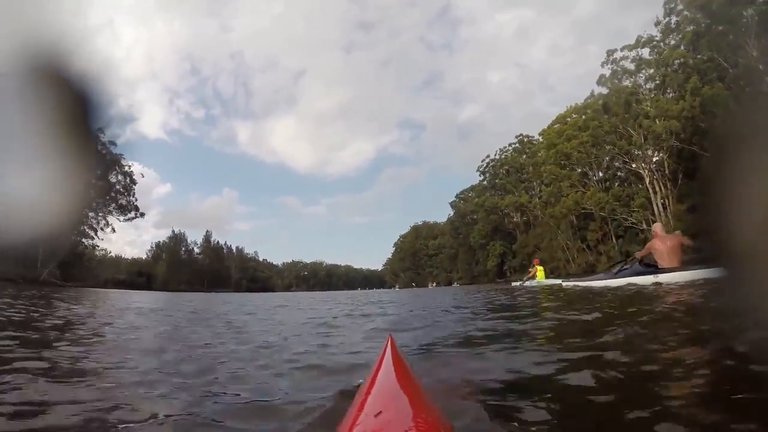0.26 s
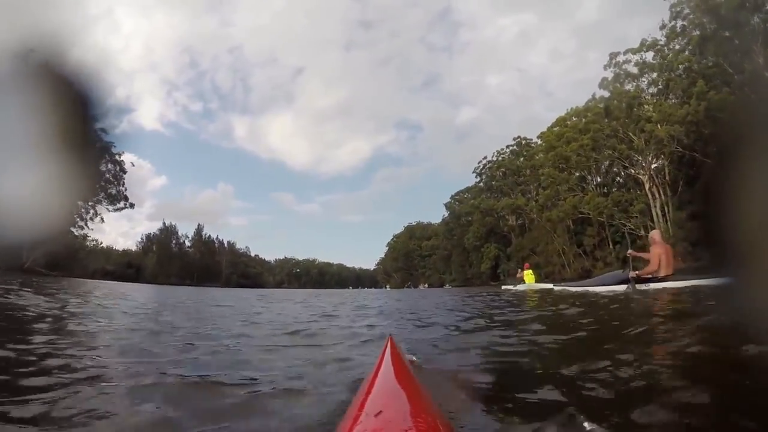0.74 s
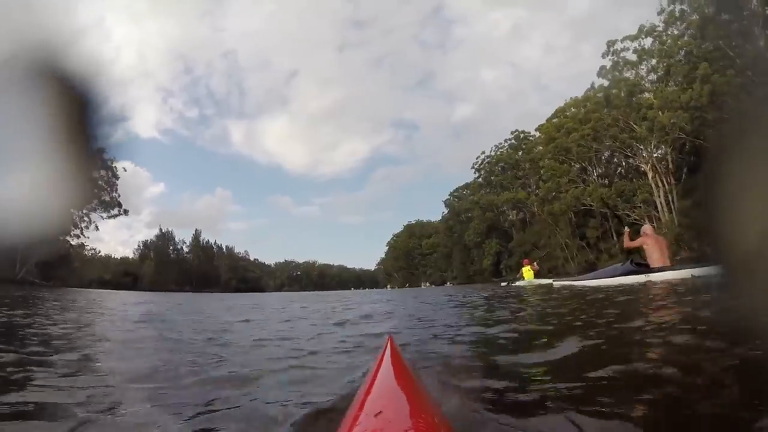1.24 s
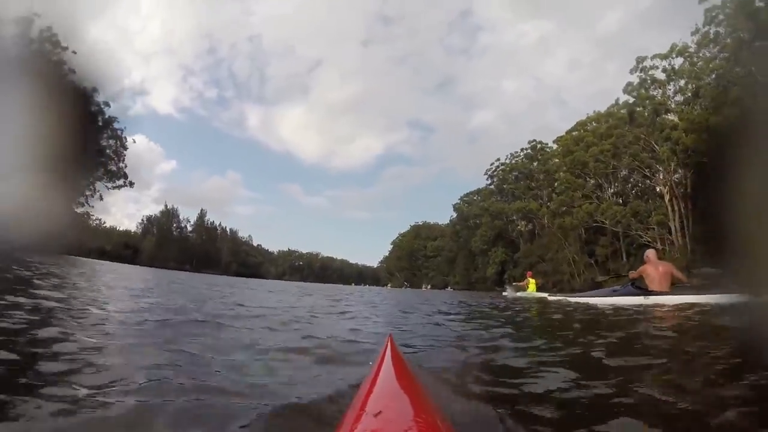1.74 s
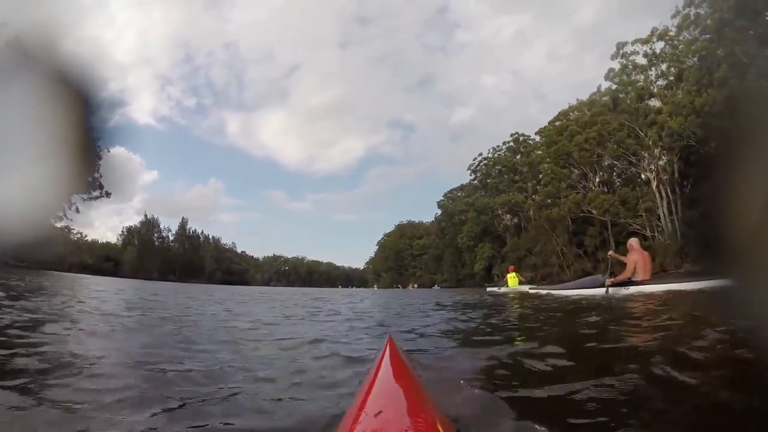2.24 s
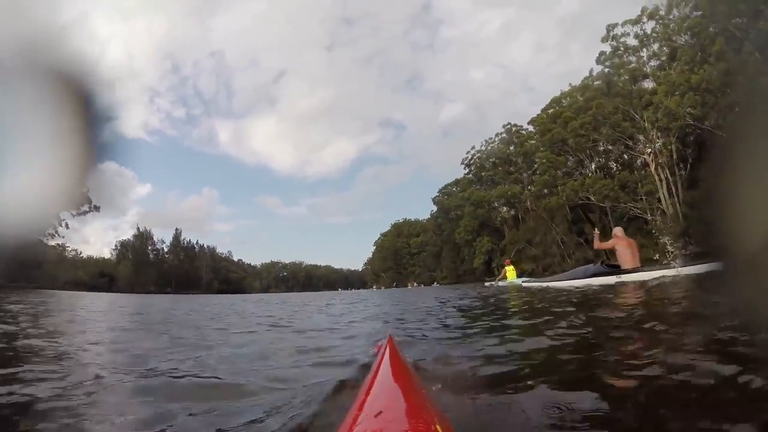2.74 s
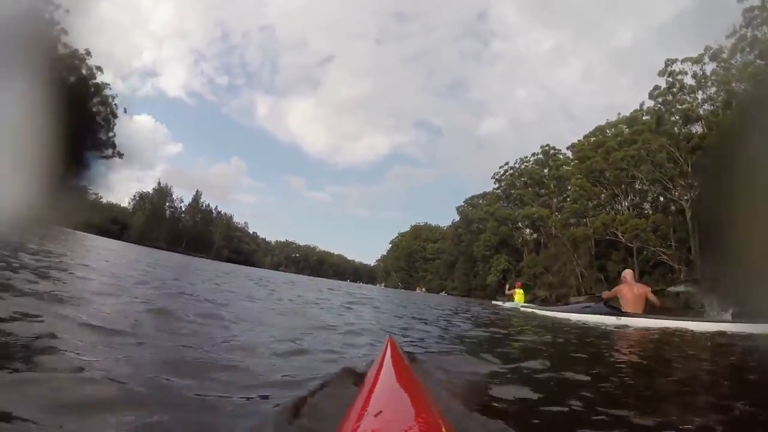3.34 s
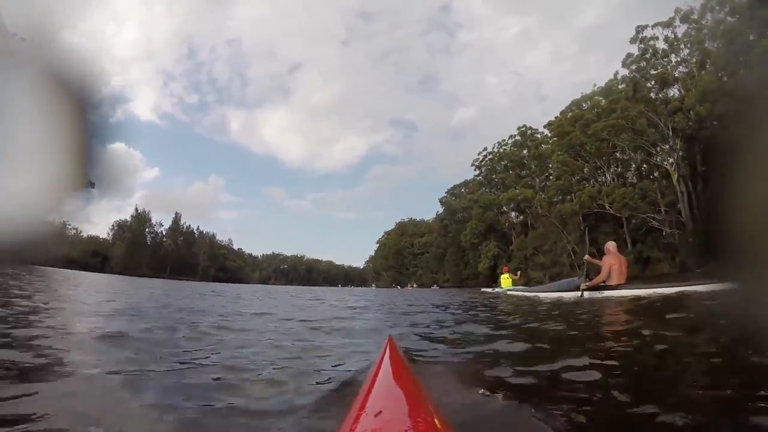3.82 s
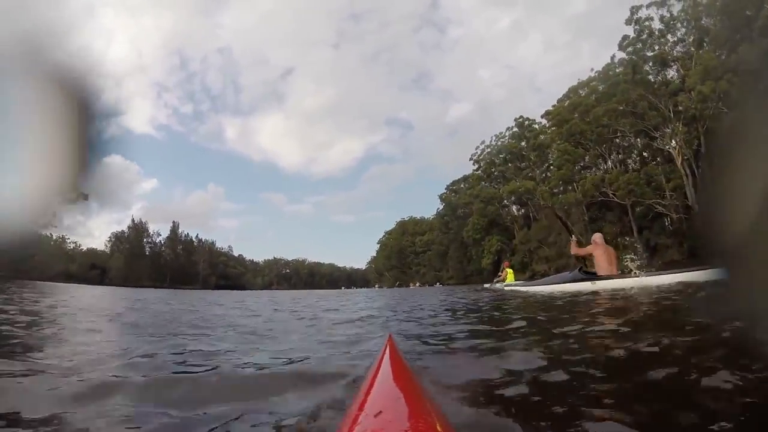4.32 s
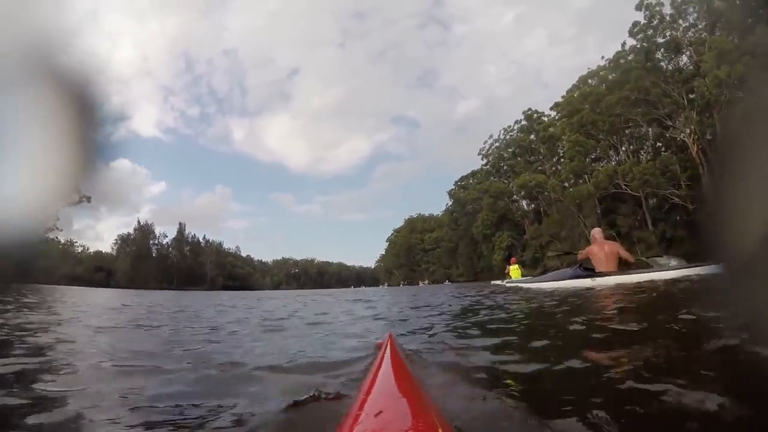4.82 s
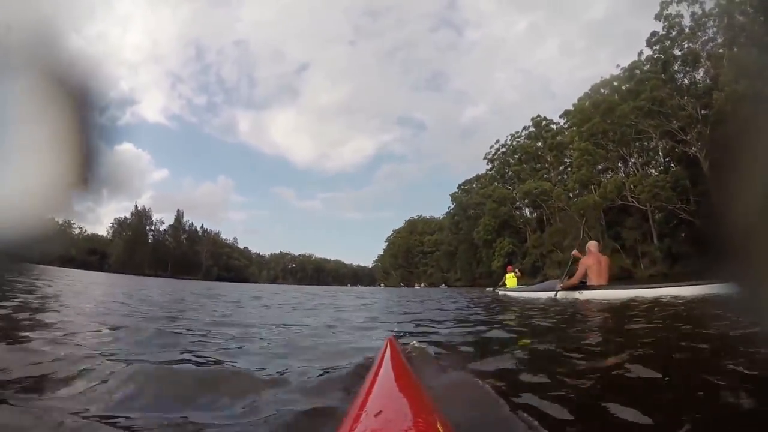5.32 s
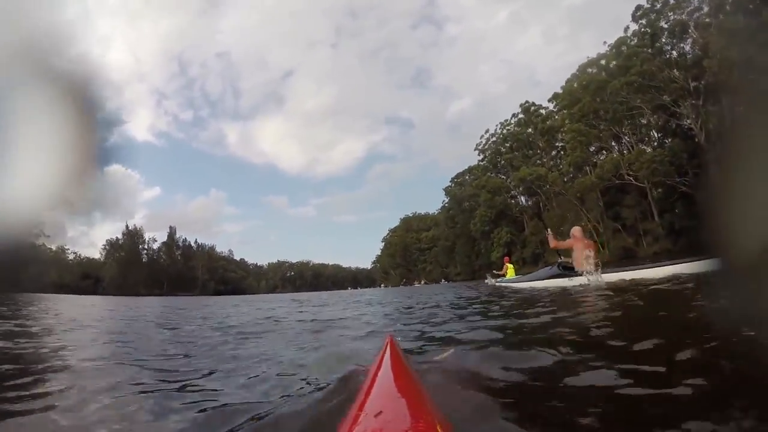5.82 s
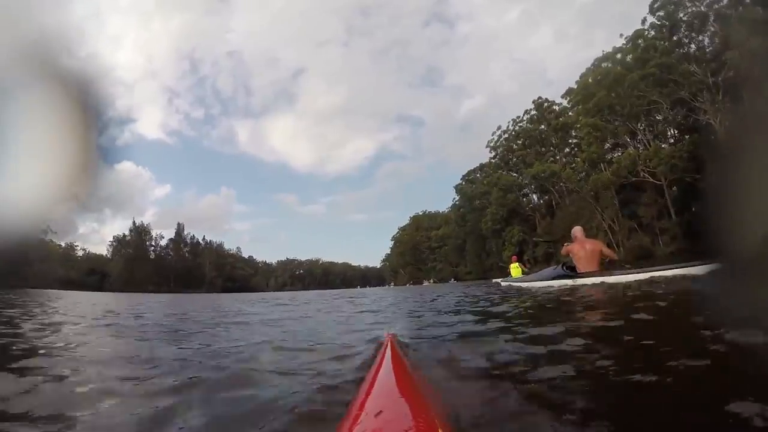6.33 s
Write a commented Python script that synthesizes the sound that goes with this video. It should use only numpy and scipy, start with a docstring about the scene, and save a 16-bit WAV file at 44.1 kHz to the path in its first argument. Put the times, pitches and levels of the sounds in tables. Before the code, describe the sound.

Close, muffled water slaps, drips and gurgles along a moving kayak hull, over a hollow drone, with a single soft thump near the middle.

```python
"""Wavelets slap the bow of a racing kayak in short plops, among fizzing bubbles and drips, on a calm creek.
Slaps and drips are ringing bubbles with froth; air gulping under the hull is a falling run of bubbles.
Filtered noise and bubble swarms make the wash; narrow noise bands make the hollow hull drone and shudder.
One dull knock, probably from the paddle, is a sum of decaying modes with a rattle after it.
A camera in a closed housing on the deck hears it; a faint whine, and a faint hiss that differs
between the channels, lie under all."""
import sys
import numpy as np
from scipy import signal
from scipy.fft import rfft, irfft, next_fast_len
from scipy.io import wavfile
from scipy.ndimage import uniform_filter1d

SR = 44100
rng = np.random.default_rng(int(sys.argv[2]) if len(sys.argv) > 2 else 0)


def generate_wav(sig):
    """Save sig (samples, or channels by samples) to the path in sys.argv[1] as 16-bit PCM at SR."""
    pcm = np.round(np.clip(np.atleast_2d(sig).T, -1, 1) * 32767).astype(np.int16)
    wavfile.write(sys.argv[1], SR, pcm)


N = 289737
TIME = np.arange(N) / SR  # s
LEAD_S = 0.012  # froth before the main bubble of a splash

# water running along the hull, reference level over time: [t/s, level/dB]
FLOW_LEVEL = [(0.0, -39), (0.44, -37.5), (0.75, -37), (1.26, -37.5), (2.69, -40.5), (3.05, -36.5),
              (3.5, -37), (3.79, -38.5), (4.9, -37.5), (5.12, -36.5), (5.27, -34), (5.67, -38.5),
              (6.18, -35.5), (6.57, -36.5)]
# response of deck and housing to a slap: [f/Hz, level/dB]
HOUSING_RESPONSE = [(400, -5.5), (740, 3.5), (920, -4.5), (1280, 3), (1550, -6), (2250, 3.5), (2560, -5),
                    (2800, -0.5), (3650, -7), (4100, -8.5), (6300, -6), (7000, -13.5)]


def undb(db):
    """Level definition: decibels to amplitude gain."""
    return 10 ** (np.asarray(db) / 20)


def unit(x):
    """Normalisation to rms 1, by mean power."""
    return x / np.sqrt(np.mean(x ** 2))


def curves(rows):
    """Linear interpolation in time of each column of a table."""
    s, *columns = np.transpose(rows)
    return [np.interp(TIME, s, column) for column in columns]


def add(out, s, sound):
    """Superposition: mix a sound into out from time s on."""
    start = int(np.clip(s * SR, 0, N - 1))
    out[start:start + len(sound)] += sound[:N - start]


def colour(x, points):
    """Linear filtering by a spectrum of (f/Hz, level/dB) points, joined on a logarithmic frequency axis."""
    hz, db = np.transpose(points)
    size = next_fast_len(len(x) + 4096)
    f = np.maximum(np.fft.rfftfreq(size, 1 / SR), 1)
    gain = undb(np.interp(np.log(f), np.log(hz), db))
    return irfft(rfft(x, size) * gain, size)[:len(x)]


def band(hz, width_hz, size):
    """Resonance driven by noise: random sound around one frequency, rms 1."""
    f = np.fft.rfftfreq(size, 1 / SR)
    response = 1 / (1 + (2 * (f - hz) / width_hz) ** 4) ** 0.61
    return unit(irfft(rfft(rng.standard_normal(size)) * response, size))


def walk(rate):
    """Random modulation: smoothed steps at the given rate per second, rms 1."""
    hold = int(SR / rate)
    steps = np.repeat(rng.standard_normal(N // hold + 1), hold)
    return unit(uniform_filter1d(steps, hold)[:N])


def fade(t, t60):
    """Exponential decay: 60 dB down after t60."""
    return np.exp(-np.log(1000) * t / t60)


def swells(rows, rise_s, t60):
    """Addition of powers: one envelope per level column, each event rising to its time and then decaying."""
    s, *columns = np.transpose(rows)
    t = TIME - s[:, None]
    shape = np.exp(-(np.minimum(t, 0) / rise_s) ** 2) * fade(np.maximum(t, 0), t60)
    return [np.sqrt(undb(column) ** 2 @ shape ** 2) for column in columns]


def bubble(hz, cycles, rise, glide):
    """Volume resonance of a bubble: swells over rise cycles, decays 60 dB in cycles and glides; envelope peak 1."""
    turn = np.arange(int(cycles * SR / hz) + 2) * hz / SR
    shape = (1 - np.exp(-(turn / rise) ** 2)) * fade(turn, cycles)
    phase = turn * (1 + glide * turn / cycles / 2) + rng.random()
    return shape / shape.max() * np.sin(2 * np.pi * phase)


def swarm(rate, low_hz, high_hz, cycles, spread_db):
    """Incoherent superposition of many bubbles with random time, pitch, strength and ringing."""
    out = np.zeros(N)
    for when, pitch, size, life in rng.random((int(rate * N / SR), 4)):
        gain = undb(-spread_db * np.log(size + .02))
        hz = low_hz * (high_hz / low_hz) ** pitch
        add(out, when * N / SR, gain * bubble(hz, cycles * (.5 + life), rise=0.35, glide=0.035))
    return out


def splash(hz, ring_cycles, beads_db, froth_db, froth_t60, width_hz):
    """Bubble entrainment by a slap: a main bubble LEAD_S in, four beads of nearby pitch after it, and froth."""
    t = np.arange(4096) / SR - LEAD_S
    froth_shape = np.where(t > 0, fade(t, froth_t60), fade(np.abs(t), 0.0075))
    out = undb(froth_db) * band(hz, width_hz, size=4096) * froth_shape
    add(out, LEAD_S, bubble(hz, ring_cycles, rise=0.9, glide=0.022 + 0.13 * rng.standard_normal()))
    for late, detune in rng.standard_normal((4, 2)):
        bead = bubble(hz * np.exp(0.1585 * detune), ring_cycles, rise=1.95, glide=0.082)
        add(out, LEAD_S + 0.002006 + .007 * abs(late), undb(beads_db) * bead)
    return out


def mode(hz, width_hz, steadiness):
    """Sustained resonance: noise in a narrow band, its beating evened out by steadiness; rms near 1."""
    x = band(hz, width_hz, size=next_fast_len(N))
    envelope = np.abs(signal.hilbert(x))
    return unit((x / (envelope + 0.57) ** steadiness)[:N])


def stereo_hiss():
    """Uncorrelated noise: an independent faint hiss in each of two channels."""
    # hiss spectrum: [f/Hz, level/dB]
    hiss_spectrum = [(35, -39), (60, -2), (209, -19.5), (355, 0), (514, -3.5), (2780, -2), (4410, 0.5),
                     (15000, -33.5)]
    hiss = np.array([unit(colour(rng.standard_normal(N), hiss_spectrum)) for _ in range(2)])
    return undb(-68.0) * hiss


def whine():
    """Pure tones: the camera's faint steady whine."""
    # tones: [f/Hz, rms level/dB]
    tones = [(10645, -78.5), (13187, -89)]
    return sum(undb(db) * np.sqrt(2) * np.sin(2 * np.pi * hz * TIME) for hz, db in tones)


def hull():
    """Forced resonance: the boat flexes, swells sound its hollow boom and deck panels, over rumble and slosh."""
    # slow flexing of the whole boat, before a fixed gain: [t/s, level/dB]
    flex_level = [(0.0, -39), (0.46, -31.5), (0.51, -44), (0.68, -32.5), (1.11, -47.5), (1.26, -28.5),
                  (1.53, -40), (1.77, -29.5), (2.47, -51), (2.61, -41), (3.18, -46), (3.33, -22),
                  (3.84, -25.5), (4.03, -47), (4.08, -41), (4.43, -37), (4.5, -34), (4.94, -48),
                  (5.14, -25), (5.65, -59), (6.17, -32), (6.57, -58)]
    # swells that shove the hull: [t/s, hollow boom level/dB, deck panel level/dB]
    shoves = [(0.32, -38.5, -34.5), (0.5, -36.5, -61), (0.85, -34, -34), (1.09, -39, -35),
              (1.31, -34.5, -40), (1.61, -31, -33.5), (1.97, -34, -36.5), (2.19, -33, -49),
              (2.42, -40, -33), (2.58, -33.5, -38.5), (2.9, -31.5, -47), (3.07, -30, -34), (3.52, -32, -34),
              (3.74, -38, -40), (4.11, -30, -36), (4.53, -26.5, -49), (4.96, -32.5, -38.5),
              (5.2, -38.5, -36.5), (5.4, -59, -37), (5.6, -34, -61), (6.14, -37.5, -38.5),
              (6.35, -37.5, -47), (6.54, -36.5, -37.5)]
    # spectrum of the dull rumble: [f/Hz, level/dB]
    rumble_spectrum = [(15, -1.5), (38, -2.5), (52, -17.5), (72, 0), (92, -4), (150, -7.5), (180, -8.5),
                       (210, -2), (280, -6), (325, -25), (410, -16), (500, -23), (900, -55)]
    # a wave sloshing along the underside: [centre t/s, 1/e half-length/s, f/Hz, bandwidth/Hz, level/dB]
    sloshes = [(2.435, 0.11, 415, 48, -49.5), (2.453, 0.2, 203, 72, -37.5)]

    boom_push, deck_push = swells(shoves, rise_s=0.057, t60=0.74)
    # steady ringing goes on between the shoves
    boom_gain = np.hypot(undb(-43.5), boom_push)
    deck_gain = np.hypot(undb(-44.5), deck_push)
    flex_db, = curves(flex_level)
    flex = undb(flex_db + 1.8) * mode(28.75, 6.5, steadiness=0.89)
    boom = boom_gain * mode(125.1, 16.7, steadiness=1.0)
    deck = deck_gain * mode(257.0, 41.3, steadiness=0.16)
    # the rumble swells with the deck, over a compressed range
    rumble = undb(-25.0) * deck_gain ** 0.36 * unit(colour(rng.standard_normal(N), rumble_spectrum))
    slosh = np.zeros(N)
    for s, length, hz, width_hz, db in sloshes:
        shape = np.exp(-((TIME - s) / length) ** 2)
        slosh += undb(db) * shape * mode(hz, width_hz, steadiness=0.27)
    return flex + boom + deck + rumble + slosh


def knock():
    """Modal excitation: one soft, heavy blow rings all hull modes, and the housing rattles in its mount after it."""
    # hull modes, levels before the blow's weighting: [f/Hz, level/dB, t60/s]
    hull_modes = [(29.5, -40, 0.37), (58, -14.5, 0.5), (89.9, -21, 1), (124.4, -8, 0.54),
                  (148.3, -23, 0.72), (215, -19, 0.21), (229.6, -8, 0.14), (257.5, -19, 0.5),
                  (420, -25.5, 0.086)]
    # weighting of the modes by the soft blow: [f/Hz, level/dB]
    blow_spectrum = [(270, -1.5), (325, -15), (400, -7), (600, 7)]
    # rattling of the housing, levels before its weighting: [t/s, level/dB]
    ticks = [(3.3147, -26), (3.318, -28), (3.353, -26), (3.358, -37)]
    # weighting of the rattle, falling towards the treble: [f/Hz, level/dB]
    rattle_spectrum = [(1800, 10), (3000, 4), (6300, -1.5), (7500, -15), (10000, -4), (12000, -4)]

    thump, rattle = np.zeros(N), np.zeros(N)
    t = np.arange(SR) / SR
    ring = sum(undb(db) * fade(t, t60) * np.sin(2 * np.pi * hz * t) for hz, db, t60 in hull_modes)
    onset = 1 - np.exp(-(t / .003) ** 2)
    add(thump, 3.2985, ring * onset)
    for s, db in ticks:
        add(rattle, s, undb(db) * band(4000, 7500, size=1024) * fade(t[:1024], .006))
    return colour(thump, blow_spectrum) + colour(rattle, rattle_spectrum)


def wash():
    """Flow noise and bubble ringing: a rush, gurgle and fine fizz along the hull, surging as waves break."""
    # waves breaking on the bow: [t/s, foam level/dB, spray level/dB]
    breakers = [(0.58, -51, -50), (0.86, -31, -51.5), (1.07, -43, -50), (1.28, -31.5, -41.5),
                (2.2, -37, -53), (2.5, -37, -63), (2.63, -40.5, -49.5), (2.97, -29, -44.5),
                (3.66, -56, -45.5), (4.38, -29.5, -46.5), (4.65, -36, -51), (4.94, -32, -47.5),
                (5.1, -37, -47), (5.28, -39, -61), (5.54, -51, -68), (5.67, -35.5, -49), (6.04, -35, -48.5),
                (6.55, -30, -49)]
    # spectrum of the churning water: [f/Hz, level/dB]
    water_spectrum = [(300, -12.5), (500, -17.5), (630, -6.5), (750, 1), (920, -9), (1280, -5.5),
                      (1550, -5.5), (2200, -1), (2380, -6), (2560, -18), (2760, -6.5), (3300, -34.5),
                      (3700, -26), (6000, -51.5)]
    # spectrum of the spray: [f/Hz, level/dB]
    spray_spectrum = [(2400, 1), (3200, 7), (3700, -0.5), (4050, 5.5), (4750, 0), (4950, -0.5),
                      (5350, -4.5), (6300, -3.5), (6750, -12.5), (8200, -18), (10400, -13.5), (11500, -40),
                      (13200, -43), (15000, -48)]

    flow_db, = curves(FLOW_LEVEL)
    foam, thrown = swells(breakers, rise_s=0.031, t60=0.38)
    surge = undb(1.71 * walk(45))
    rush = unit(colour(rng.standard_normal(N), water_spectrum))
    gurgle_bubbles = swarm(rate=330, low_hz=1093, high_hz=3550, cycles=76, spread_db=6.5)
    gurgle = unit(colour(gurgle_bubbles, water_spectrum))
    hiss = unit(colour(rng.standard_normal(N), spray_spectrum))
    fizz_bubbles = swarm(rate=1300, low_hz=2950, high_hz=9070, cycles=62, spread_db=6.5)
    fizz = unit(colour(fizz_bubbles, spray_spectrum))
    # steady flow and breaking waves add in power
    churn_gain = np.hypot(undb(flow_db + 0.5), foam)
    spray_gain = np.hypot(undb(flow_db - 15.5), thrown)
    churn = churn_gain * (undb(-3.0) * rush + undb(-3.5) * gurgle)
    spray = spray_gain * (undb(-4.0) * hiss + undb(2.5) * fizz)
    return surge * (churn + spray)


def gulps():
    """Larger bubbles ring lower: an air pocket breaks into a ragged falling run; its collapse thumps the deck."""
    # air pockets under the hull, levels before fixed gains and the housing:
    # [t/s, level/dB, first f/Hz, last f/Hz, length/s, hull push level/dB]
    pockets = [(0.29, -28, 1330, 890, .04, -35), (0.828, -28, 1140, 583, 0.04, -24.5),
               (0.889, -36, 1250, 680, 0.038, -44), (1.131, -23, 1090, 754, .02, -23),
               (1.564, -21.5, 1245, 660, 0.025, -25), (2.226, -29, 1290, 820, 0.032, -36),
               (4.656, -29, 980, 563, 0.024, -22), (5.159, -28.5, 1410, 960, 0.028, -55),
               (5.834, -25, 1240, 700, 0.024, -30), (6.548, -30.5, 1120, 650, 0.037, -22)]

    out = np.zeros(N)
    for s, db, first_hz, last_hz, length, push_db in pockets:
        for step in np.linspace(0, 1, 5):
            late, detune = rng.standard_normal(2) * (.0015, .1)
            hz = first_hz * (last_hz / first_hz) ** step * np.exp(detune)
            blob = splash(hz, ring_cycles=22, beads_db=-8.5, froth_db=-7.5, froth_t60=0.089, width_hz=1120)
            add(out, s - LEAD_S + length * step + late, undb(db + 0.5 - 12.0 * step) * blob)
        add(out, s, undb(push_db + 4) * bubble(255, cycles=27, rise=2.0, glide=0.11))
    return colour(out, HOUSING_RESPONSE)


def ripples():
    """Random arrivals: light slaps, louder when the flow is; rows of (t/s, level/dB, f/Hz)."""
    rate = 7.5  # per second
    chance = rng.random((int(rate * N / SR), 3))
    s = chance[:, 0] * N / SR
    size, pitch = np.sqrt(12) * (chance[:, 1:].T - .5)  # uniform, standard deviation 1
    db = np.interp(s, *np.transpose(FLOW_LEVEL)) + 9.5 + 2.8 * size
    hz = 2030 * 2 ** (.12 * pitch)  # scatter in octaves
    return list(zip(s, db, hz))


def plops():
    """Ringing of entrained air: wavelets and ripples slap the bow and drops land beside it."""
    # wavelets slapping the bow, levels before a fixed gain and the housing: [t/s, level/dB, f/Hz]
    wavelets = [(0.095, -23.5, 1960), (0.175, -19, 2050), (0.259, -22.5, 1750), (0.64, -21, 1990),
                (0.738, -20, 2050), (0.826, -16.5, 1570), (0.889, -16.5, 1400), (1.052, -25.5, 2100),
                (1.086, -21, 1780), (1.1, -27.5, 2080), (1.156, -24, 2200), (1.27, -16, 2440),
                (1.358, -23, 1710), (1.506, -24, 1710), (1.878, -15, 1890), (2.133, -24.5, 1890),
                (2.144, -21, 1660), (2.219, -14, 1650), (2.232, -21, 1860), (2.243, -20.5, 1700),
                (2.293, -17.5, 1740), (2.362, -21, 1830), (2.589, -21.5, 1970), (2.635, -23, 2130),
                (2.792, -21.5, 2010), (2.833, -16, 1850), (2.939, -17.5, 2150), (2.952, -12.5, 2085),
                (3.025, -21.5, 2090), (3.051, -22.5, 1430), (3.08, -22, 2830), (3.167, -19.5, 2050),
                (3.385, -25.5, 1235), (3.396, -22, 2250), (3.52, -23, 1980), (3.57, -23.5, 1770),
                (3.694, -25.5, 2210), (3.796, -23, 1690), (4.081, -23.5, 2160), (4.113, -22, 1740),
                (4.346, -14.5, 2260), (4.357, -13.5, 2130), (4.394, -13.5, 2160), (4.416, -17, 2300),
                (4.631, -14.5, 2075), (4.686, -19.5, 1730), (4.813, -25, 1270), (4.909, -21, 1900),
                (4.924, -12, 1730), (5.075, -21, 1470), (5.127, -21.5, 2200), (5.142, -19, 1750),
                (5.171, -23.5, 1520), (5.238, -20, 2290), (5.286, -20, 1800), (5.339, -24, 1310),
                (5.444, -22, 2330), (5.536, -21, 2100), (5.694, -18.5, 1800), (5.828, -22.5, 1950),
                (5.948, -23, 1990), (6.049, -23, 1760), (6.215, -22.5, 1830), (6.324, -24, 2050),
                (6.382, -22.5, 1960), (6.421, -15, 1890), (6.537, -20, 2120)]
    # small drops landing close by, levels before a fixed gain and the housing: [t/s, level/dB, f/Hz]
    drips = [(0.542, -24, 4040), (0.583, -26, 4040), (0.868, -25.5, 4070), (1.156, -28, 4000),
             (2.953, -25.5, 6100), (3.059, -28.5, 4630), (3.207, -25, 4100), (3.26, -28.5, 4250),
             (4.632, -29, 5850), (4.909, -28.5, 4780), (5.237, -23, 3300), (5.657, -25, 3300),
             (5.994, -27, 4100)]

    out = np.zeros(N)
    for s, db, hz in list(wavelets) + ripples():
        slap = splash(hz, ring_cycles=34.4, beads_db=-11.5, froth_db=-10, froth_t60=0.041, width_hz=1610)
        add(out, s - LEAD_S, undb(db + 2) * slap)
    for s, db, hz in drips:
        drop = splash(hz, ring_cycles=61, beads_db=-12, froth_db=-3.5, froth_t60=0.024, width_hz=1850)
        add(out, s - LEAD_S, undb(db + 1.5) * drop)
    return colour(out, HOUSING_RESPONSE)


def scene():
    """Superposition: water, boat and whine are one common signal; only the hiss differs between channels."""
    common = whine() + hull() + knock() + wash() + gulps() + plops()
    return common + stereo_hiss()


def record(dry):
    """Band limitation: the camera cuts the top with a steep elliptic low-pass."""
    top_hz = 14900
    lowpass = signal.ellip(8, .2, 70, top_hz, fs=SR, output="sos")
    return signal.sosfilt(lowpass, dry)


dry = scene()
out = record(dry)
generate_wav(out)
```